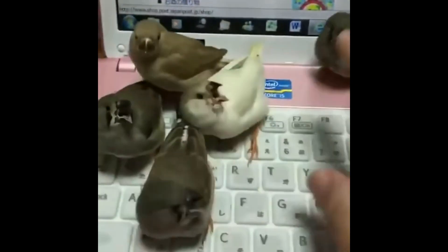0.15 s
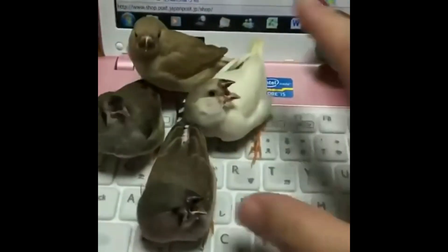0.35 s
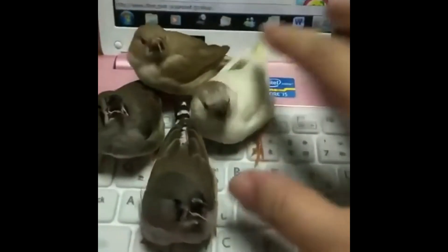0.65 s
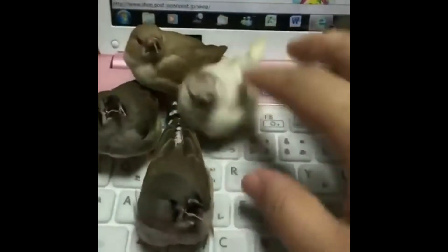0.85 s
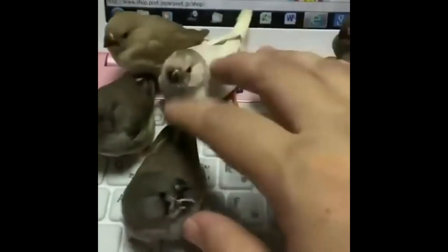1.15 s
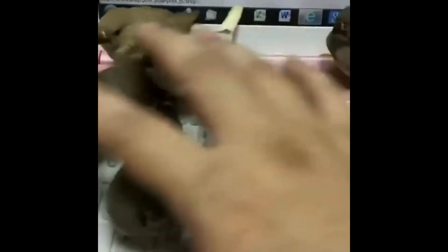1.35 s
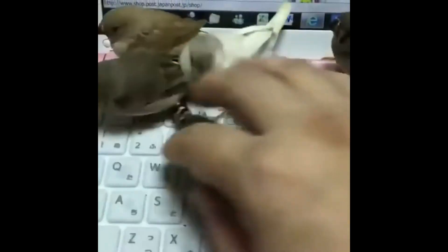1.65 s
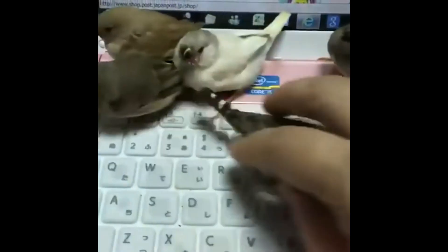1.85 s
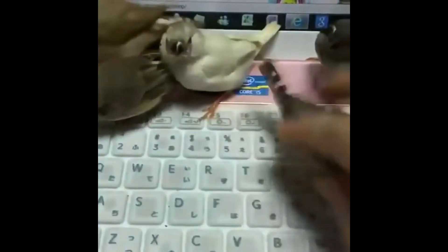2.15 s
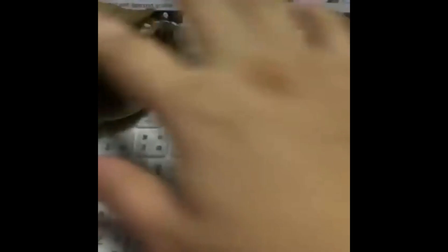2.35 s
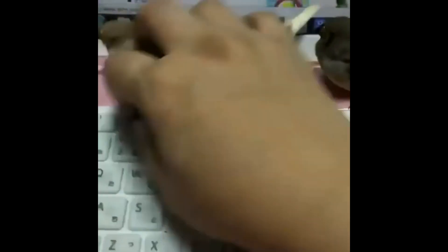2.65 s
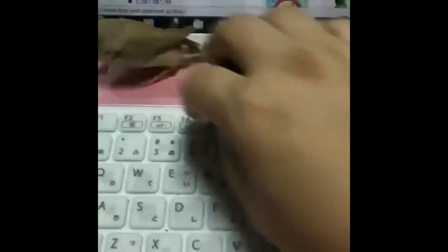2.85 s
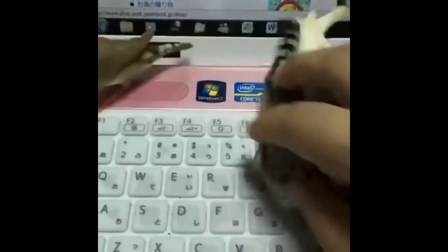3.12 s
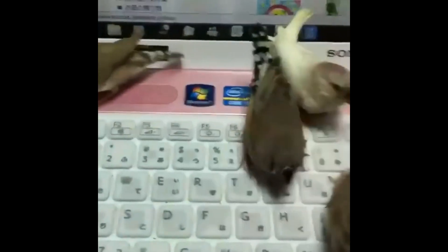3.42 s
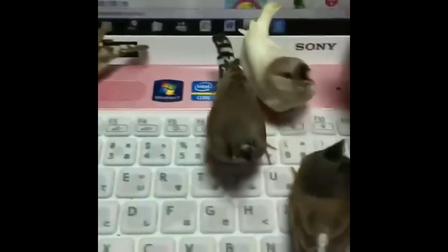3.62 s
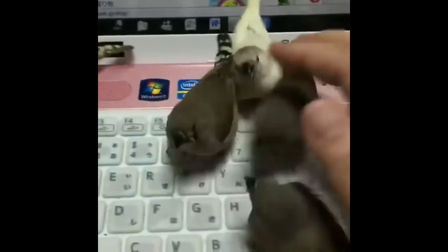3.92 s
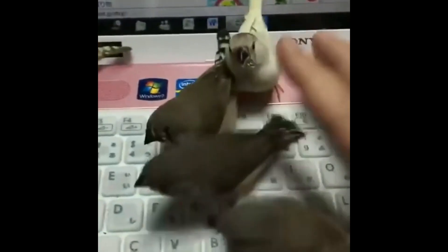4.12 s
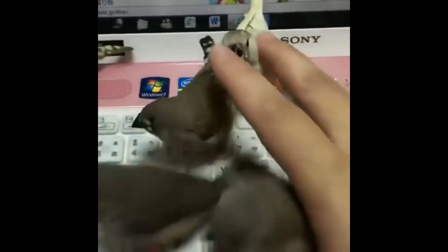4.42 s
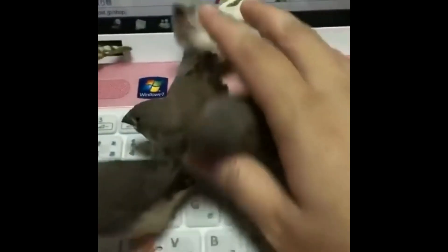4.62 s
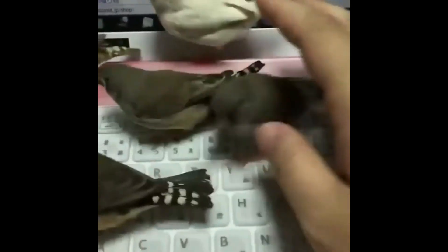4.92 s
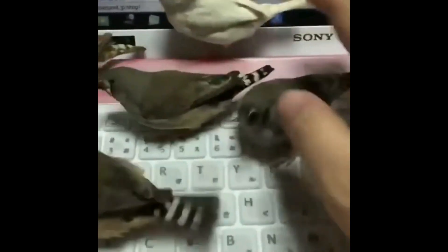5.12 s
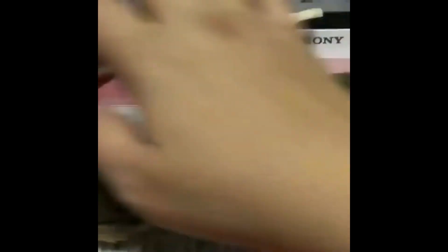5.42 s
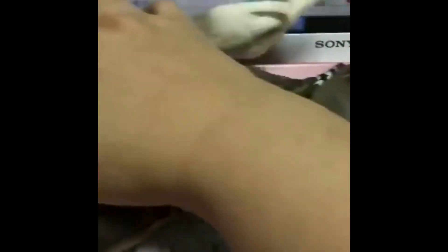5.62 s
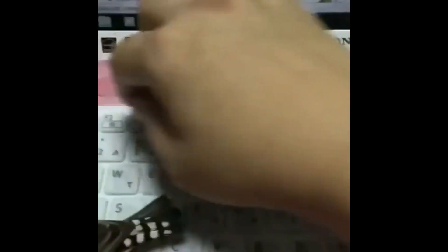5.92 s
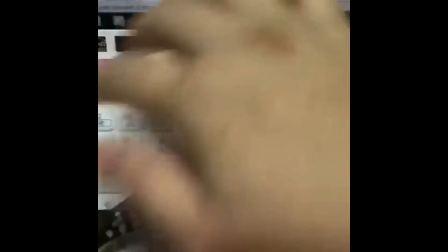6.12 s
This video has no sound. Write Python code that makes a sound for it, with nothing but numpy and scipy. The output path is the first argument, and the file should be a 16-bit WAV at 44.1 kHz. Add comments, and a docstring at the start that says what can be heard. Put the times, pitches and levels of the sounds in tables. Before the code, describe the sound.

Dense, raspy chatter of pestered little finches, short nasal peeps and loud two-toned squawks, with light key clatter in a small room.

```python
"""A few small finches, pestered by a hand on a laptop keyboard, protest in overlapping calls close by.
They give arching nasal whines and loud two-voiced squawks, in which both sides of the syrinx (the
bird's voice box) buzz at two pitches about a major third apart. Throat and beak colour each buzz.
Feet and fingers tap the plastic keys, made from short ringing tones.
The small room adds a short tail and rumbles faintly, made from shaped noise."""
import sys
import numpy as np
from scipy import signal
from scipy.fft import rfft, irfft
from scipy.io import wavfile

SR = 44100
rng = np.random.default_rng(int(sys.argv[2]) if len(sys.argv) > 2 else 0)


def inscribe(sig):
    """Save sig as 16-bit PCM at rate SR to the path in sys.argv[1].

    A 1-D sig is mono; a 2-D sig holds one channel per row.
    Samples are clipped to [-1, 1] before scaling.
    """
    pcm = np.round(np.clip(np.atleast_2d(sig).T, -1, 1) * 32767)
    wavfile.write(sys.argv[1], SR, pcm.astype(np.int16))


N = 276507   # length in samples

# The nasal calls. Pitch, effort and beak gape are those of the middle of the call; glide and swell
# are how far pitch and effort climb from there to the end. All levels are before the final mix.
# Each row: start in seconds, end in seconds, pitch in Hz, glide as a share of the pitch, effort in dB,
# swell in dB, beak gape in dB, throat resonance in dB, beak resonance in Hz, rasp from 0 to 1.
WHINE_CALLS = [(0, 0.097, 710, 0.048, 2, -2.5, 2, 2.5, 3870, 0.36),
               (0.13, 0.334, 612.4, 0.035, 0, -2, 3.5, 2, 3900, 0.35),
               (0.325, 0.46, 643, 0.033, -10.5, -8, -1, -2, 3970, 0.43),
               (0.46, 0.539, 622, 0.072, -1.5, 4, 5.5, 5, 4030, 0.37),
               (0.54, 0.691, 662, 0.13, -3.5, 1, 0, -1.5, 3860, 0.37),
               (.708, 0.886, 664.5, 0.11, 1, 1.5, 3.5, 1.5, 4420, 0.35),
               (0.981, 1.147, 600, 0.019, -0.5, 3, 2, 3, 4360, 0.34),
               (1.078, 1.243, 568, -0.087, 2, -2, 2, -5, 3970, 0.24),
               (1.325, 1.428, 723, .1, 2, 5, -7, -4, 4200, 0.35),
               (1.417, 1.57, 539, 0.017, 1, -1.5, -1, -4.5, 3900, 0.19),
               (1.559, 1.785, 705, 0.017, -13.5, -10.5, 1.5, 0.5, 3400, 0.41),
               (1.827, 1.928, 628, 0.097, -12.5, 1, -15, 7, 3500, 0.37),
               (1.982, 2.087, 638, .12, -13, 3, 3.5, 6.5, 3750, 0.42),
               (2.364, 2.412, 490, 0.0048, -16, 3, 1, 4, 3400, 0.35),
               (2.4, 2.513, 692, 0.21, -9.5, -1, -1, 2, 3900, 0.31),
               (2.546, 2.788, 729.4, .04, -3.5, -0.5, 1, 0.5, 3900, 0.36),
               (2.808, 2.974, 726, 0.089, -7.5, 0, 1, 4, 4120, 0.36),
               (2.962, 3.07, 703, 0.14, -12.5, 8, 6, 1.5, 3530, 0.52),
               (3.058, 3.196, 724, 0.12, -6, -1.5, 5, 1.5, 3920, 0.29),
               (3.213, 3.383, 707.4, 0.14, 1.5, 1.5, -3, -1, 7050, 0.34),
               (3.389, 3.54, 709, 0.088, 5, 2.5, -2.5, -1.5, 6700, 0.43),
               (3.528, 3.667, 692.5, 0.093, 4.5, 8.5, -8, -1, 6800, 0.4),
               (3.68, 3.831, 765, .13, -1, 1.5, 1.5, -1, 6960, 0.33),
               (3.772, 3.89, 682, 0.098, 6.5, 3.5, -13, -2, 7000, 0.38),
               (3.894, 4.055, 709, 0.047, -5, 1.5, 0, 3, 4540, 0.33),
               (4.092, 4.243, 708, 0.1, -2.5, 1, 6.5, 2.5, 4240, 0.33),
               (4.253, 4.426, 657.3, 0.072, 0.5, 1, 3, 0.5, 4360, 0.27),
               (4.549, 4.686, 657, 0.095, -3, -1, 1, 2.5, 3840, 0.39),
               (4.66, 4.785, 735, -0.019, 0, 9, 0, 3, 3940, 0.43),
               (4.812, 4.979, 690, 0.11, -2.5, 3, -3, -0.5, 4000, 0.41),
               (4.965, 5.125, 703, .06, 4, 1, -6.5, 0, 5800, 0.28),
               (5.17, 5.385, 707, .14, 2, 3.5, 0.5, -1.5, 6020, 0.31),
               (5.372, 5.567, 729, 0.038, 2.5, 1, -1.5, 2, 6630, 0.46),
               (5.56, 5.723, 743, 0.048, -2.5, -2.5, 3.5, 4, 7450, 0.5),
               (5.738, 5.926, 738, .1, -12, 3, 9.5, 6, 4600, .3),
               (5.911, 6.02, 756, 0.094, -9, -1, -1.5, 9, 3670, 0.36),
               (6.014, 6.134, 739, 0.056, -1, 3.5, 2.5, 6, 4450, 0.5),
               (6.124, 6.229, 607, 0.15, -5, 0.5, -5, 4.5, 7160, 0.4),
               (6.227, 6.277, 649, 0.066, -8.5, 7, -1.5, 10, 5860, 0.5)]
# The tone colour of a whine at middling effort. Each row: frequency in Hz, level in dB per Hz.
WHINE_COLOUR = [(500.0, -52.5), (750.0, -64.5), (1000.0, -57), (1450.0, -54.5), (2000.0, -61),
                (2500.0, -64), (3100.0, -59.4), (3800.0, -55.5), (4500.0, -55), (5700.0, -54),
                (6800.0, -58), (8200.0, -68.5), (11500.0, -73), (15000.0, -81)]
WHINE_ATTACK_S, WHINE_RELEASE_S = .016, 0.027
WHINE_HUMP_DB = 4   # effort lies this far below the middle at both ends
WHINE_CLOSING_DB = 2.9   # the beak closes: its gape falls by this much in each half of a call
WHINE_AIR_DB = 1   # air noise at the top


def whines():
    """A nasal arch; the raspier the call, the more a second voice a third higher blurs it."""
    out = np.zeros(N)
    for start, end, hz, glide, level_db, swell_db, gape_db, throat_db, beak_hz, rasp in WHINE_CALLS:
        at, swing, valve = gesture(start, end, WHINE_ATTACK_S, WHINE_RELEASE_S)
        pitch = hz * arch(swing, glide)
        # clear calls are also steadier
        main_voice = syrinx(pitch, rasp, jitter=0.0402, flicker_db=11.9 * rasp, smear=0.1464)
        second_voice = syrinx(pitch * 1.25, rasp, jitter=0.0507, flicker_db=6, smear=0.269)
        source = rms_one(main_voice + 2.24 * rasp ** 2 * second_voice)
        push_db = effort(swing, level_db, swell_db, WHINE_HUMP_DB)
        closing_gape_db = gape_db - WHINE_CLOSING_DB * swing
        call = tract(source, WHINE_COLOUR, push_db, closing_gape_db, throat_db, WHINE_AIR_DB,
                     np.full(len(at), beak_hz), ring_db=10.5, ring_width_hz=637)
        out[at] += valve * call
    return out


def arch(swing, glide, droop=.05, droop_per_glide=.45):
    """Pitch relative to the middle: it sags at both ends, more in climbing calls, less in falling ones."""
    return 1 + glide * swing - (droop + droop_per_glide * glide) * swing ** 2


# The loud calls. Pitch is the note on which the lower side settles; effort and gape are those of the
# middle, and swell is how far effort climbs from there to the end. All levels are before the final mix.
# Each row: start in seconds, end in seconds, pitch in Hz, effort in dB, swell in dB, beak gape in dB,
# throat resonance in dB, air noise in dB, pitch ratio of the second side to the first.
SQUAWK_CALLS = [(.175, 0.307, 745, -1.5, 6.5, 2, -5.5, 1, 1.28),
                (0.351, 0.48, 757, 2, 3.5, -4.5, -3, 3, 1.19), (0.565, 0.676, 745, 3, 2, -3, 2, -1, 1.23),
                (0.836, 0.943, 747, 4, 2, -5.5, -3, -4.5, 1.3),
                (1.32, 1.447, 740, -6.5, 9.5, 1, -0.5, 2, 1.21),
                (1.595, 1.73, 750, 0.5, -3, -8.5, -1.5, 7.5, 1.29),
                (1.829, 1.942, 732.6, -2.5, 8, -4, -2, 1, 1.28),
                (2.074, 2.187, 733.5, -0.5, 7, -2.5, -0.5, 2.5, 1.26),
                (2.432, 2.545, 756, 1.5, 2.5, -1, -0.5, 4.5, 1.29),
                (2.62, 2.744, 761, 0, 7, -5.5, 6, -2, 1.3), (2.871, 2.972, 746, -5.5, 6, -13, 5, -15, 1.26),
                (3.276, 3.373, 731, -12, 1, 8, 2, -6, 1.35), (3.483, 3.617, 769, 0.5, 2, 0.5, 0.5, 4, 1.27),
                (3.711, 3.854, 776, 0, 5.5, -1, -4.5, 4.5, 1.26),
                (3.905, 4.04, 741, 3.5, 2.5, -2, -2, 2, 1.27),
                (4.14, 4.259, 740, 0, -0.5, -5, -7, -0.5, 1.26),
                (4.439, 4.549, 751, 4, 4, -7.5, -0.5, 5, 1.23),
                (4.678, 4.791, 726.6, 1.5, 0, -2.5, -7, 0, 1.34),
                (4.887, 5.019, 754, 2, -0.5, -7.5, -7, 1, 1.27),
                (5.172, 5.266, 725, 2, 0, -3.5, -2, -1, 1.32), (5.372, 5.496, 760, 5, 5, -9, -12, 5, 1.3),
                (5.582, 5.689, 765.5, -3.5, 3, 1, 6.5, -8, 1.26),
                (5.801, 5.923, 758.6, -9.5, 5.5, 0, 11, 5.5, 1.26),
                (6.026, 6.143, 755, -7.5, 14, -6, 7.5, -4, 1.24)]
# The tone colour of a squawk at middling effort. Each row: frequency in Hz, level in dB per Hz.
SQUAWK_COLOUR = [(500.0, -48), (750.0, -62.5), (1000.0, -60), (1450.0, -56), (2000.0, -62.0), (2500.0, -57),
                 (3100.0, -59), (3800.0, -53.5), (4500.0, -50.5), (5700.0, -52), (6800.0, -55),
                 (8200.0, -68), (11500.0, -67), (15000.0, -77.5)]
# The beak resonance sinks during a squawk. The values: its frequency in Hz at start, middle and end.
SQUAWK_BEAK_PATH = [9460, 6700, 6300]
SQUAWK_ATTACK_S, SQUAWK_RELEASE_S = .023, 0.015
# same meaning as in the whines, but larger: a stronger hump and a faster closing beak
SQUAWK_HUMP_DB, SQUAWK_CLOSING_DB = 7, 7.5
LOWER_SCOOP, UPPER_SCOOP = .1, .17   # each side starts flat by this share; the upper one scoops further


def squawks(upper_db=1.7, coupling=0.094, mid_rasp=0.32, clearing=0.14):
    """Both sides sound, about a major third apart; sharing one airflow, they beat and throw off side tones."""
    out = np.zeros(N)
    for start, end, hz, level_db, swell_db, gape_db, throat_db, air_db, ratio in SQUAWK_CALLS:
        at, swing, valve = gesture(start, end, SQUAWK_ATTACK_S, SQUAWK_RELEASE_S)
        lower_hz = hz * scoop(at / SR - start, LOWER_SCOOP)
        upper_hz = hz * ratio * scoop(at / SR - start, UPPER_SCOOP)
        rasp = mid_rasp * (1 - clearing * swing)   # the voice clears as it settles
        lower = syrinx(lower_hz, rasp, jitter=0.026, flicker_db=2.5, smear=.37)
        upper = syrinx(upper_hz, rasp, jitter=0.031, flicker_db=5.0, smear=0.224)
        beat = np.cos(2 * np.pi * np.cumsum(upper_hz - lower_hz) / SR)
        source = rms_one((lower + from_db(upper_db) * upper) * (1 + coupling * beat))
        push_db = effort(swing, level_db, swell_db, SQUAWK_HUMP_DB)
        closing_gape_db = gape_db - SQUAWK_CLOSING_DB * swing
        call = tract(source, SQUAWK_COLOUR, push_db, closing_gape_db, throat_db, air_db,
                     along(SQUAWK_BEAK_PATH, swing), ring_db=11.5, ring_width_hz=1130)
        out[at] += valve * call
    return out


def scoop(age_s, depth, settle_s=.022):
    """Pitch relative to the note on which a call settles: it starts flat and quickly climbs."""
    return 1 - depth * np.exp(-np.maximum(age_s, 0) / settle_s)


def gesture(start, end, attack_s, release_s):
    """Samples of a call, its swing from -1 at the start to 1 at the end, and the opening of its air valve."""
    opens, closes = start - attack_s / 3, end + release_s / 4
    at = np.arange(max(int(opens * SR), 0), min(int(closes * SR), N))
    s = at / SR
    valve = ramp(s - opens, 0, attack_s) * ramp(closes - s, 0, release_s)
    return at, 2 * ramp(s, start, end) - 1, valve


def effort(swing, level_db, swell_db, hump_db):
    """The push of air through a call: one hump, leaning early or late."""
    return level_db + swell_db * swing - hump_db * swing ** 2


def syrinx(pitch, rasp, jitter, flicker_db, smear):
    """One vibrating side: a buzz that wanders in pitch, with a puff of turbulence in each cycle; rms 1."""
    size = len(pitch)
    wandering_hz = pitch * (1 + jitter * rasp * waver(size, 332.6))
    phase = 2 * np.pi * np.cumsum(wandering_hz) / SR
    k = np.arange(1, 31)[:, None]   # numbers of the partials
    flicker = from_db(flicker_db * np.array([waver(size, 53.1) for _ in k]))
    # high partials lag the low ones, so each pulse is spread over its cycle
    partials = flicker * np.cos(k * phase - smear * k * k)
    buzz = rms_one((partials * (k * pitch < SR / 2)).sum(0))
    puffs = rng.standard_normal(size) * (1 + .5 * np.cos(phase))
    high_pass = signal.butter(2, 7500, "high", fs=SR, output="sos")
    hiss = signal.sosfilt(high_pass, rng.standard_normal(size))
    return rms_one(buzz + rasp * (1.51 * puffs + 3.57 * hiss))


THROAT_HZ, THROAT_WIDTH_HZ = 1650, 750   # the nasal resonance
AIR_LEAK = 0.23   # this share of the gape is taken off the air noise


def tract(source, voice, effort_db, gape_db, throat_db, air_db, beak_hz, ring_db, ring_width_hz):
    """Throat, windpipe and beak colour the buzz; the beak has a resonance, and opening it lets out treble."""
    hz, s, frames = signal.stft(source, SR, nperseg=256, noverlap=192)
    hz = hz[:, None]
    now = np.minimum((s * SR).astype(int), len(source) - 1)
    low = ramp(hz, 3780, 2770)
    db = at_hz(voice, hz) + effort_db[now] * (1 - 0.76 * low)   # the lows grow less with effort
    db = db + throat_db * np.exp(-((hz - THROAT_HZ) / THROAT_WIDTH_HZ) ** 2)
    db = db + gape_db[now] * ramp(hz, 4780, 6340)
    db = db + (air_db - AIR_LEAK * gape_db[now]) * ramp(hz, 8100, 8150)
    db = db + ring_db * np.exp(-((hz - beak_hz[now]) / ring_width_hz) ** 2)
    # the windpipe's top resonance, over a gently lowered treble
    db = db + 6 * np.exp(-((hz - 12100) / 1100) ** 2) - 3 * ramp(hz, 5200, 11000)
    gain = from_db(db) * ramp(hz, 480, 970) * np.sqrt(SR / 2)
    return signal.istft(frames * gain, SR, nperseg=256, noverlap=192)[1][:len(source)]


# The touches on the keys, levels before the final mix.
# Each row: time in seconds, level of the low thud in dB, level of the high click in dB.
KEY_TAPS = [(1.262, -44, -28), (1.778, -27, -36), (1.809, -20, -16.5), (1.819, -35, -23),
            (2.011, -15.5, -10), (2.301, -49, -25), (2.326, -17, -12), (2.361, -35, -18), (2.883, -16, -17),
            (2.987, -13, -23), (3.053, -11, -6.5), (3.171, -14, -14), (3.327, -11.5, -18),
            (3.798, -8.5, -32), (4.027, -13, -28), (4.083, -20, -33), (4.260, -21, -10), (4.293, -13, -10),
            (4.504, -14.5, -22), (4.820, -26, -30), (5.517, -16.5, -16), (6.014, -1.5, -10),
            (6.187, -11.5, -31), (6.246, -10, -18)]
# The tones at which keys and case ring.
# Each row: frequency in Hz, level in dB, time to fade by 60 dB in seconds.
KEYBOARD_TONES = [(233, -21.5, 0.053), (349, -16.5, 0.088), (490, -13, 0.055), (600, -5, 0.026),
                  (740, -8, 0.039), (902, -6.5, 0.044), (1130, 5, 0.011), (1530, -1, 0.021),
                  (1880, 1, 0.012), (2210, -1, 0.014), (2930, -1, 0.013), (3400, 4.5, 0.0047),
                  (4600, -5, .012), (7000, -8.5, 0.0027), (11300, -11, .006)]


def taps(rattle=0.11, rattle_s=0.0019):
    """Each touch rattles a key briefly: soft weight rings the low modes, hard claws the high ones."""
    s, thud_db, click_db = np.transpose(KEY_TAPS)
    age = np.arange(1024) / SR
    # one sharp knock, then a fading rattle
    rattles = rattle * rng.standard_normal((len(s), len(age))) * np.exp(-age / rattle_s)
    contacts = (age == 0) + rattles
    out = np.zeros(N)
    for k, (hz, db, t60) in enumerate(KEYBOARD_TONES):
        force = np.zeros(N + len(age))
        hard = ramp(hz, 1500, 1600)   # 0 for low tones, 1 for high ones
        blows_db = thud_db * (1 - hard) + click_db * hard
        for when, contact, blow_db in zip(s, contacts, blows_db):
            first = int(when * SR)
            force[first:first + len(age)] += contact * from_db(blow_db + db)
        decay = from_db(-60 / (t60 * SR))   # per sample
        w = 2 * np.pi * hz / SR
        ringing = signal.lfilter([0, np.sin(w)], [1, -2 * decay * np.cos(w), decay * decay],
                                 force[:N] + 1e-18)
        out += (-1) ** k * ringing   # neighbouring tones start in opposite directions
    return out


ROOM_T60_S, ROOM_DB = 0.1, -18.5   # fading time, and level of the tail relative to the direct sound


def room(x):
    """The furnished room adds a short faint tail: fading noise, dulled, behind the direct sound."""
    age = np.arange(SR // 2) / SR
    fade = from_db(-60 * age / ROOM_T60_S) * ramp(age, 0.0014, 0.0058)
    response = rng.standard_normal(len(age)) * fade
    response = signal.lfilter(*signal.butter(1, 5000, fs=SR), response)
    response *= from_db(ROOM_DB) / np.linalg.norm(response)
    response[0] += 1   # the direct sound
    return signal.fftconvolve(x, response)[:N]


# The tone colour of the room's rumble, before the final mix.
# Each row: frequency in Hz, level in dB per Hz.
ROOM_RUMBLE = [(20, -88), (55, -84), (95, -79), (180, -79), (300, -85), (500, -88.5), (1200, -90),
               (3000, -99), (7000, -103), (15000, -113)]


def background(waver_db=3.0, waver_rate=7):
    """Dull rumble of the room, shaped from noise; its level wavers."""
    hz = np.arange(N // 2 + 1) * SR / N
    spectrum = rfft(rng.standard_normal(N)) * from_db(at_hz(ROOM_RUMBLE, hz))
    rumble = irfft(spectrum, N) * np.sqrt(SR / 2)
    return rumble * from_db(waver_db * waver(N, waver_rate))


def from_db(db):
    """Decibels to a plain factor."""
    return 10 ** (np.asarray(db) / 20)


def rms_one(x):
    """Scale a sound to an rms level of 1."""
    return x / np.sqrt(np.mean(x ** 2) + 1e-20)


def at_hz(points, hz):
    """A spectrum read on a log-frequency axis."""
    table = np.array(points)
    return np.interp(np.log(hz + 1), np.log(table[:, 0]), table[:, 1])


def ramp(x, zero, one):
    """A straight climb from 0 to 1 between two points."""
    return np.clip((x - zero) / (one - zero), 0, 1)


def along(values, swing):
    """Straight lines through evenly spaced moments of a call."""
    return np.interp(swing, np.linspace(-1, 1, len(values)), values)


def waver(size, rate):
    """Chance wandering: straight lines between random points of spread 1, `rate` points a second."""
    knots = rng.standard_normal(2048)
    return np.interp(np.arange(size) * rate / SR, np.arange(len(knots)), knots)


def scene():
    """Calls and taps sound in the room, over its rumble; both channels are the same."""
    birds = from_db(-0.33) * whines() + from_db(1.44) * squawks()
    keys = from_db(-10.5) * taps()
    sound = room(birds + keys) + from_db(2.5) * background()
    return np.array([sound, sound])


CUTOFF_HZ = 15600


def record(dry):
    """The highest peaks are rounded and the top is cut."""
    rounded = dry / (1 + dry ** 12) ** (1 / 12)
    low_pass = signal.ellip(10, .2, 80, CUTOFF_HZ, fs=SR, output="sos")
    return signal.sosfilt(low_pass, rounded)


dry = scene()
out = record(dry)
inscribe(out)
```